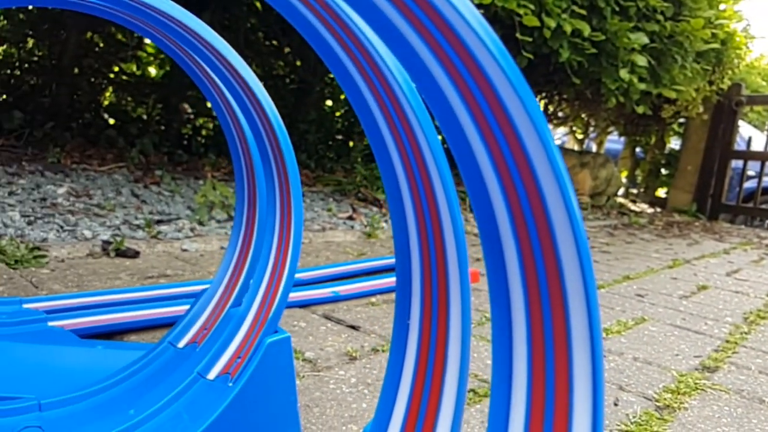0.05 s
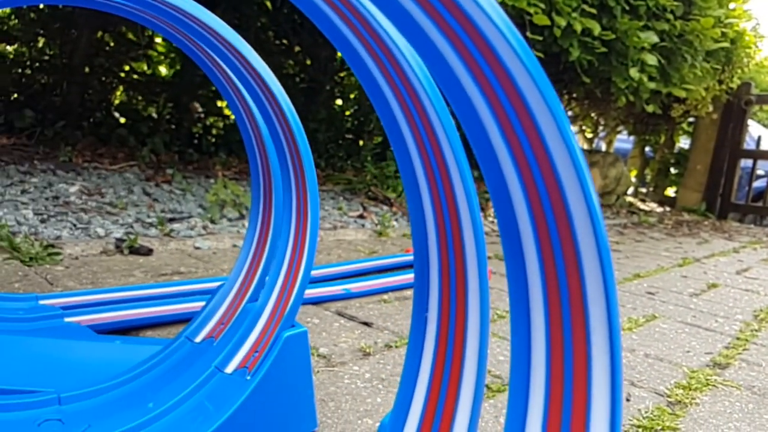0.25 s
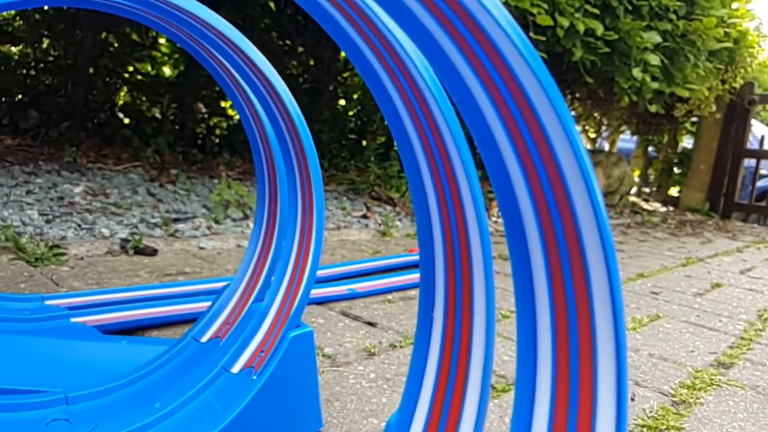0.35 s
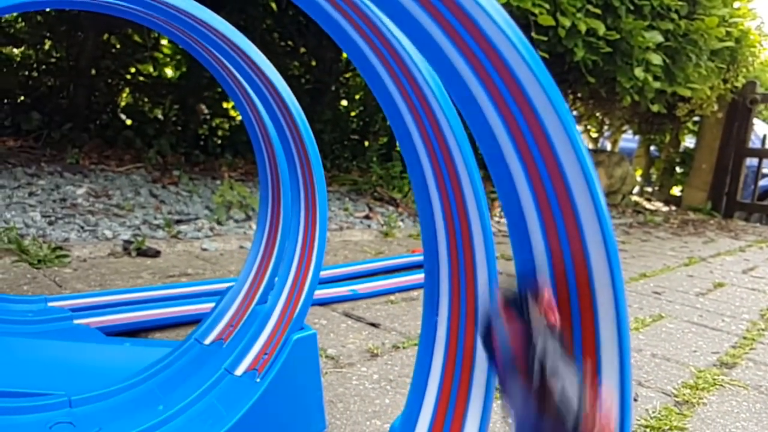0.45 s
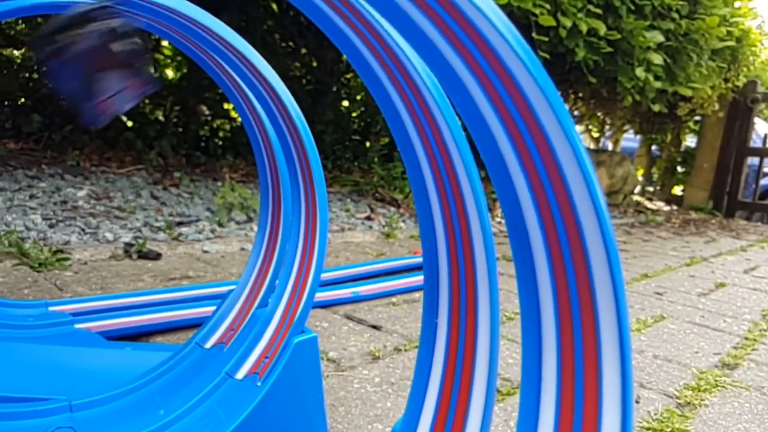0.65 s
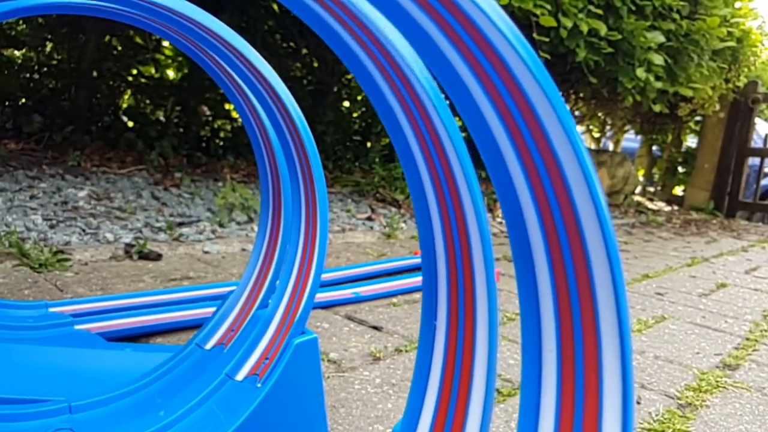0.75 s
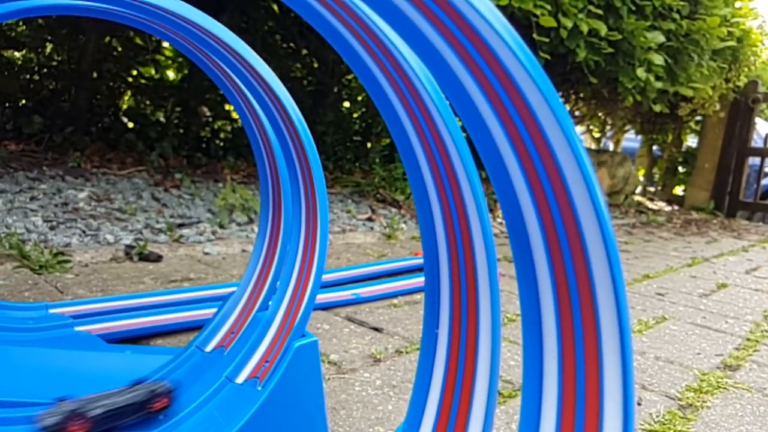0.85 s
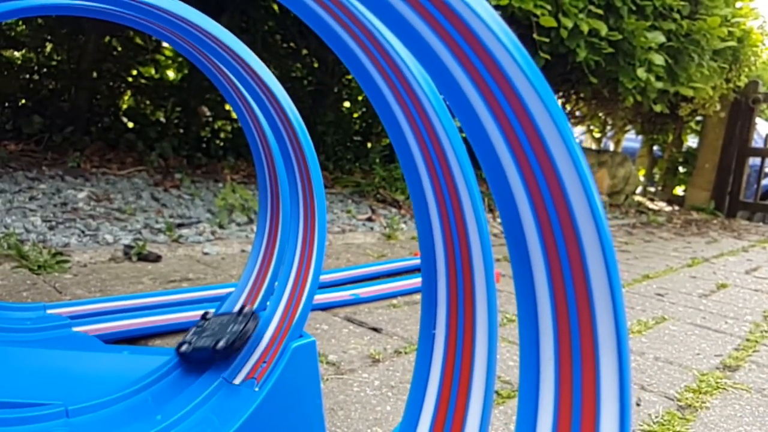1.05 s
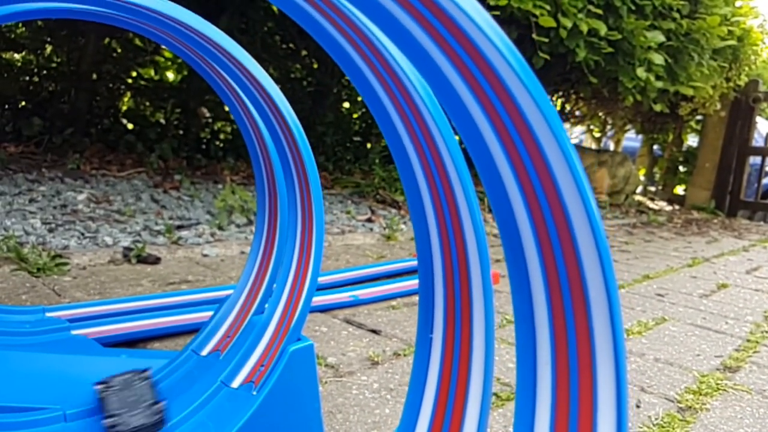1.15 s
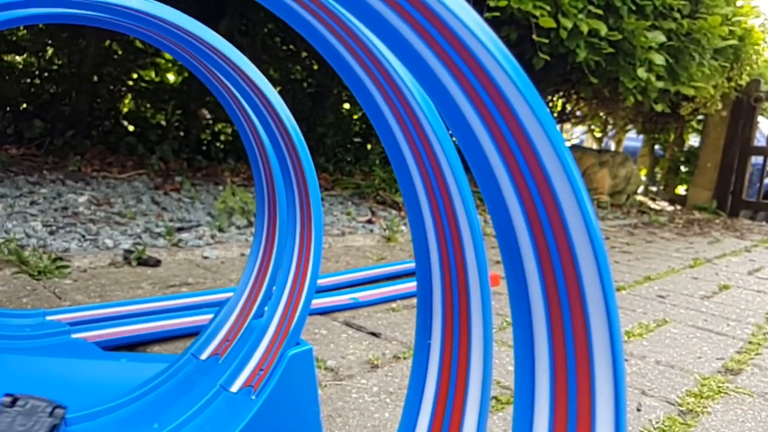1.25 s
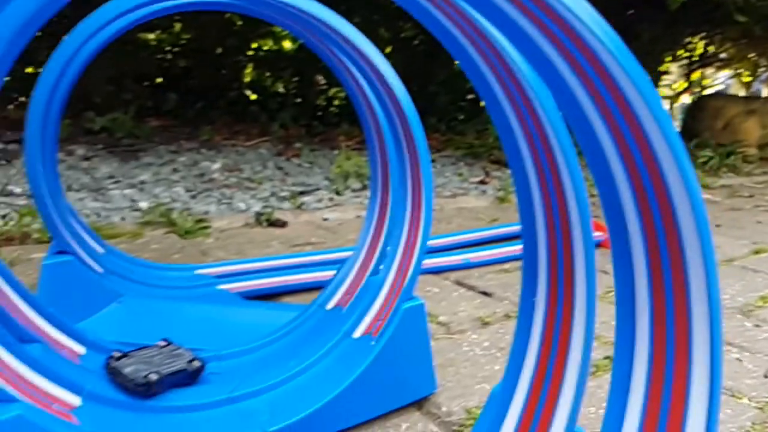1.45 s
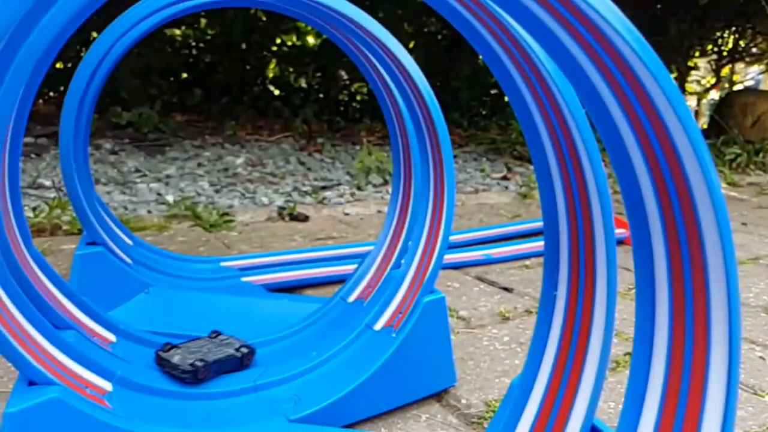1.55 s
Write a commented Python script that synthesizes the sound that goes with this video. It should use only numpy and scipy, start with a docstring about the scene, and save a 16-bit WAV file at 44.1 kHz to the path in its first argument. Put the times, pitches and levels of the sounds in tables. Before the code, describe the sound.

A small metal toy car clatters harshly on hollow plastic track, drops, knocks and rolls away

```python
"""A die-cast toy car rattles round a plastic loop in a garden, drops off, tumbles on the base and rolls out.
Blows and wheel chatter are clicks into decaying modes of the hollow plastic track and the metal car,
with short noise ticks; longer rings of base and axles and a low rumble go with them.
A small bird chirps in gliding, husky tones over far traffic, made of coloured noise."""
import sys
import numpy as np
from scipy import signal
from scipy.fft import rfft, irfft
from scipy.io import wavfile

SR = 44100
rng = np.random.default_rng(int(sys.argv[2]) if len(sys.argv) > 2 else 0)


def ratio(d):
    """dB to gain"""
    e = np.asarray(d, float) / 20
    return 10 ** e


def wav_out(sig):
    """Save sig, one row per channel (or a flat mono array), as 16-bit PCM at SR to the path in sys.argv[1]."""
    wavfile.write(sys.argv[1], SR, np.round(np.clip(np.atleast_2d(sig).T, -1, 1) * 32767).astype(np.int16))


N = 70560
T, F = np.arange(N) / SR, np.fft.rfftfreq(N, 1 / SR)

# Far traffic colour. Each row: frequency in Hz, relative level in dB.
TOWN_COLOUR = [(12, -20), (20, -18.5), (151, -3.5), (351, -18.5), (1350, -12.5), (1600, -35.5),
               (3830, -8.5), (6000, -38.5), (7100, -61.5), (13600, -24.5), (16500, -58)]
# Low rumble. Each row: time in seconds, rms level in dB.
RUMBLE_LEVEL = [(0, -58.5), (.5, -52), (.7, -65), (.9, -54.5), (1.1, -65), (1.6, -63.5)]
# Bird, one list a note. Each row: time in seconds, pitch in Hz, relative level in dB.
BIRD_NOTES = [
    [(.015, 3386, -50), (.035, 4590, -47), (.055, 4600, -50), (.068, 3740, -34.5), (.08, 3460, -55),
     (.09, 3220, -73)],
    [(.02, 3100, -61), (.032, 3334, -57), (.05, 3675, -39), (.06, 3650, -67)],
    [(.068, 2400, -65), (.085, 2920, -46.5), (.1, 2960, -46), (.112, 3180, -70), (.135, 2950, -80)],
    [(.08, 4240, -72), (.092, 4600, -74), (.105, 3760, -65), (.12, 4000, -72)],
    [(.0, 5570, -65), (.02, 6020, -54), (.035, 5700, -69), (.06, 5260, -83)],
]
# Wheels chattering on the track. Each row: time in seconds, relative levels of track ring, car ring and
# tick in dB, middle car ring centre in Hz, left minus right of the whole car in dB.
WHEEL_CHATTER = [(0, -72, -58, -75.5, 3620, 2.5), (.185, -66, -64.5, -78, 2400, 0),
                 (.215, -58, -38.5, -55, 2470, 2.5), (.26, -46, -32.5, -38, 2430, 1),
                 (.3, -48, -29.5, -42.5, 3900, 2.5), (.33, -47, -29, -36.5, 3600, 1.5),
                 (.365, -31.5, -23, -29, 4800, 0.5), (.378, -40, -29, -28.5, 4150, 2.5),
                 (.392, -53, -22.5, -44, 4540, 2.5), (.42, -57, -29.5, -28.5, 4170, -1),
                 (.445, -23.5, -17.5, -31, 3330, 4.5), (.463, -31.5, -38, -41, 3040, -3),
                 (.5, -31.5, -22.5, -39, 3200, -1.5), (.535, -24.5, -24, -30.5, 3300, 1.5),
                 (.556, -47, -35, -47, 3060, -1), (.595, -32, -36, -43, 4400, 1),
                 (.63, -63, -76, -60, 3760, 5), (.7, -69, -49.5, -56, 4030, 4.5),
                 (.785, -80, -76, -62, 3730, -2.5), (.8, -40, -57, -54, 3480, 0),
                 (.85, -32.5, -40, -54, 2630, 1.5), (.9, -28, -36.5, -47, 2700, 1),
                 (.95, -43.5, -35.5, -47, 2490, 2.5), (.985, -41.5, -51.5, -66, 2450, 2.5),
                 (1.02, -50.5, -47.5, -58, 2580, 1.5), (1.065, -83, -72, -70, 2540, 2.5),
                 (1.12, -50, -54.5, -58, 4000, 2.5), (1.165, -72, -63, -63.5, 2500, 0.5),
                 (1.18, -40, -38, -39, 2520, 0.5), (1.25, -40, -39, -52, 3340, 2.5),
                 (1.3, -35.5, -41.5, -52, 2530, 2), (1.35, -39, -42, -61, 2720, 2),
                 (1.4, -47, -59, -60, 2500, 0.5), (1.45, -40, -47.5, -71, 2550, 1),
                 (1.495, -50, -56.5, -73, 2540, -0.5), (1.53, -41.5, -50.5, -63.5, 2500, 0.5),
                 (1.6, -57, -60, -72, 2500, -2)]
# Blows of car on track. Each row: start in seconds, relative levels of track ring, car ring and tick
# in dB, car ring centre in Hz, track ring centre in Hz.
CAR_BLOWS = [(0.143, -48.5, -47, -55.5, 2560, 950), (0.197, -52, -40.5, -54, 2200, 902),
             (0.206, -54, -36, -68, 2250, 490), (0.215, -39.5, -49, -36.5, 2650, 740),
             (0.247, -26, -19.5, -39, 2050, 956), (0.279, -48, -24.5, -30.5, 2720, 1010),
             (0.308, -38.5, -24.5, -27, 4900, 746), (0.333, -53, -15, -24, 3800, 826),
             (0.335, -29.5, -13, -39, 3820, 880), (0.342, -28, -13.5, -52, 2530, 1430),
             (0.364, -28, -17.5, -26, 5450, 836), (0.387, -43, -20, -23, 3500, 869),
             (0.397, -49, -13.5, -27, 4440, 856), (0.412, -47, -12.5, -24, 4670, 534),
             (0.419, -50, -18, -41, 3730, 953), (0.434, -12.5, -12, -26, 4400, 697),
             (0.466, -20, -34, -24, 2100, 690), (0.476, -19.5, -13, -13, 3600, 540),
             (0.481, -21, -10.5, -33, 3580, 510), (0.489, -28, -16, -28, 3250, 727),
             (0.503, -23, -16.5, -22.5, 3300, 514), (0.523, -34, -25, -18, 3600, 740),
             (0.527, -16, -31, -23, 4070, 780), (0.537, -24, -38, -19.5, 3480, 640),
             (0.562, -18, -34, -38, 2450, 770), (0.576, -33, -23, -24, 4800, 900),
             (0.587, -30, -19, -23.5, 4640, 706), (0.791, -9, -15, -21, 3270, 682),
             (0.816, -18.5, -17, -18, 2630, 760), (0.828, -29.5, -14.5, -20, 2850, 856),
             (0.845, -27.5, -22, -27, 2560, 1250), (0.853, -18.5, -21.5, -31, 2570, 484),
             (0.874, -13.5, -13.5, -20, 2600, 850), (0.887, -5.5, -13.5, -21, 2180, 695),
             (0.904, -34, -32, -55, 2660, 680), (0.922, -11.5, -20, -33, 2980, 754),
             (0.932, -10.5, -19.5, -24.5, 1970, 763), (0.952, -16, -27.5, -51, 2140, 776),
             (0.996, -35, -57, -69, 2450, 740), (1.009, -40, -38, -38.5, 2480, 719),
             (1.091, -35, -56, -36.5, 2500, 684), (1.134, -17.5, -35, -37.5, 4060, 745),
             (1.171, -12.5, -21.5, -30, 2420, 716), (1.182, -20, -23.5, -51, 2220, 770),
             (1.193, -15.5, -22, -34, 4230, 794), (1.223, -21.5, -26, -40, 2560, 684),
             (1.234, -20, -27.5, -33.5, 4000, 666), (1.275, -20, -25.5, -38.5, 2600, 740),
             (1.312, -25, -34, -42, 2340, 735), (1.367, -21, -31, -42.5, 2450, 686),
             (1.389, -34, -40, -42.5, 2480, 764), (1.411, -40, -53, -48, 2480, 711),
             (1.433, -42, -42.5, -49.5, 2480, 700), (1.459, -32.5, -39.5, -56, 2490, 746),
             (1.51, -30.5, -46.5, -69, 2500, 710), (1.529, -34.5, -42, -54.5, 2550, 690)]
# Hollow plastic track. Each row: mode in Hz, relative level in dB, undamped t60 in seconds.
TRACK_MODES = [(240.6, -20, 0.1), (428, -16, 0.12), (531, -6.5, 0.06), (645, -8, 0.032), (740, -6, 0.064),
               (835, -3, 0.029), (973, -2, 0.021), (1230, 7, 0.032), (1425, 3.5, 0.041), (1680, 5.5, 0.043)]
# Metal car body and axles. Each row: mode in Hz, relative level in dB, undamped t60 in seconds.
CAR_MODES = [(1900, 2.5, 0.017), (2184, -1, 0.021), (2450, -0.5, 0.025), (2650, -0.5, 0.024),
             (2872, -6, 0.034), (3200, -5, 0.023), (3509, 0.5, 0.027), (3730, -6.5, 0.046),
             (4103, -2.5, 0.03), (4400, 1.5, 0.013), (4800, -5.5, 0.017), (5000, -12, 0.031),
             (6150, 1, 0.017), (6610, -6, .03)]
# Contact tick colour. Each row: frequency in Hz, relative level in dB.
TICK_COLOUR = [(880, -71), (1500, 2), (2070, -8.5), (2480, 0.5), (4340, 0.5), (5360, -0.5), (6760, -1),
               (14100, -7), (16000, -17), (16500, -66)]
# Hollow base (lowest) and loose axles. Each row: mode in Hz, relative level in dB, undamped t60 in seconds.
AXLE_MODES = [(743.6, -1, 0.11), (2480, -1.5, 0.086), (3730, -5.5, 0.093), (4227, -4.5, 0.085),
              (6500, -13, .05)]
# Drive of those rings. Each row: time in seconds, relative level in dB.
AXLE_LEVEL = [(0, -110), (.195, -100), (.22, -64), (.4, -65.5), (.58, -67), (.64, -97), (.7, -85),
              (.785, -87), (.85, -50), (.98, -79), (1.015, -67.5), (1.07, -85.5), (1.16, -82), (1.19, -58),
              (1.3, -59.5), (1.4, -70), (1.5, -84), (1.53, -77), (1.6, -85)]
# Unlike share at the two ports. Each row: frequency in Hz, gain in dB.
UNLIKE_SHARE = [(100, -13), (700, -17.5), (1500, -2.5), (3000, -1.5), (8000, -1.5), (16000, -10)]
# Port colour. Each row: frequency in Hz, left minus right in dB.
PORT_COLOUR = [(60, -1), (110, 3), (200, 1), (380, 0.5), (700, 2), (1290, 1.5), (2380, -6), (4400, -5.5),
               (8120, 1.5), (15000, 11)]
# Port timing. Each row: frequency in Hz, lag of the right port in seconds.
PORT_LAG = [(300, 0.00029), (800, .00015), (1500, 0.00012), (3000, 0.000096), (7000, 0.00026),
            (16000, 0.000252)]

TOWN_RMS_DB, RUMBLE_TOP_HZ, HUSK_HZ = -66, 222, 180
TRACK_GAIN_DB, CAR_GAIN_DB, TICK_GAIN_DB = -7, -8.5, 2
CENTRE_OCT, SCATTER_DB = .28, 3  # width of the favoured mode region, spread of mode strengths
TICK_T60_S, PUSH_SAMPLES = .018, 7
LOWEST_HZ = 216  # small parts radiate little below this
BOUNCE_GAP_S = .001198  # mean
CHATTER_PER_S, CHATTER_SPREAD_DB, CHATTER_TOP_DB = 4500, 2.2, 8
PATCH_S, PATCH_OCT, PATCH_DB = .007, .3, 2  # rolling shifts colour and strength every few ms
ROLLING_HZ = 745  # track ring centre under the wheels
CHATTER_DAMPING, AXLE_DAMPING = .43, .87  # factors on t60; rolling wheels shorten the rings
ECHO_DB, ECHO_T60_S, ECHO_START_S = -20, .2, .006


def along(table, col=1):
    """Table column read over time."""
    return np.interp(T, np.array(table)[:, 0], np.array(table)[:, col])


def over_hz(table):
    """Table read over log frequency."""
    hz, value = np.array(table).T
    return np.interp(np.log(F + 1), np.log(hz + 1), value)


def unit(x):
    """Rms 1."""
    return x / np.sqrt(np.mean(x ** 2))


def traffic():
    """Far traffic: steady coloured noise, partly unlike at the two ports."""
    shared, unlike = rfft(rng.standard_normal((2, N))) * ratio(over_hz(TOWN_COLOUR))
    unlike = unlike * ratio(over_hz(UNLIKE_SHARE))
    return ratio(TOWN_RMS_DB) * unit(irfft([shared + unlike, shared - unlike], N))


def rumble():
    """Low rumble: band-passed noise of varying level, mostly alike at the two ports."""
    band = signal.butter(2, [40, RUMBLE_TOP_HZ], "band", fs=SR)
    shared, unlike = signal.lfilter(*band, rng.standard_normal((2, N)))
    return ratio(along(RUMBLE_LEVEL)) * unit(shared + 0.25 * unlike * np.array([[1], [-1]]))


def bird():
    """Gliding sine notes made husky by slow noise in their amplitude."""
    out = np.zeros(N)
    for note in BIRD_NOTES:
        husk = signal.lfilter(*signal.butter(2, HUSK_HZ, fs=SR), rng.standard_normal(N))
        on = (T >= note[0][0]) & (T <= note[-1][0])
        tone = np.sin(2 * np.pi * np.cumsum(along(note)) / SR)
        out += on * ratio(along(note, 2)) * (.9 + 0.63 * unit(husk)) * tone
    return out


def ring(at, gains, modes, damping):
    """Clicks at samples `at` ring each mode, a decaying sine, with its own gain."""
    out = np.zeros(N)
    for (hz, db, t60_s), gain in zip(modes, gains.T):
        t60_s = max(t60_s * damping, .004)
        pole = np.exp(2j * np.pi * hz / SR - np.log(1000) / (t60_s * SR))
        out += ratio(db) * signal.lfilter([1], [1, -pole], np.bincount(at, gain, N)[:N]).imag
    return out


def mode_gains(modes, centre_hz, floor):
    """Fresh random mode strengths for each contact, favouring modes near its centre."""
    octaves = np.log2(np.array(modes)[:, 0] / centre_hz[:, None])
    near = np.exp(-.5 * (octaves / CENTRE_OCT) ** 2) + floor
    scatter = ratio(SCATTER_DB * rng.standard_normal(near.shape))
    gains = near * scatter * rng.choice([-1, 1], near.shape)
    return gains / np.sqrt(np.mean(gains ** 2, axis=1, keepdims=True))


def contact_tick(at, tick_db):
    """Coloured noise, dying away after each contact."""
    fade = np.exp(-np.log(1000) / (TICK_T60_S * SR))
    env = signal.lfilter([1], [1, -fade], np.bincount(at, ratio(tick_db + TICK_GAIN_DB), N)[:N])
    return irfft(rfft(env * rng.standard_normal(N)) * ratio(over_hz(TICK_COLOUR)), N)


def contact(sec, track_db, car_db, tick_db, car_hz, track_hz, damping=1.):
    """Each contact rings track and car and gives a short tick."""
    at = np.clip((sec * SR).astype(int), 0, N - 1)
    track_gains = ratio(track_db + TRACK_GAIN_DB)[:, None] * mode_gains(TRACK_MODES, track_hz, .1)
    track = ring(at, track_gains, TRACK_MODES, damping)
    push = np.hanning(PUSH_SAMPLES)  # softens the push on the track
    track = np.convolve(track, push / push.sum())[:N]
    car_gains = ratio(car_db + CAR_GAIN_DB)[:, None] * mode_gains(CAR_MODES, car_hz, .22)
    car = ring(at, car_gains, CAR_MODES, damping)
    high_pass = signal.butter(3, LOWEST_HZ, "high", fs=SR, output="sos")
    return signal.sosfilt(high_pass, track + car + contact_tick(at, tick_db))


def wheel_clicks():
    """Random wheel contacts: sample, size in dB and colour shift in octaves, in short patches."""
    at = np.flatnonzero(rng.random(N) < CHATTER_PER_S / SR)
    patch = rng.standard_normal((N, 2))[(at / (PATCH_S * SR)).astype(int)]
    size_db = CHATTER_SPREAD_DB * rng.exponential(size=len(at)) + PATCH_DB * patch[:, 0]
    return at, np.minimum(size_db, CHATTER_TOP_DB), PATCH_OCT * patch[:, 1]


def wheel_chatter(at, size_db, shift_oct):
    """Dense wheel clicks ring track and car, damped by the rolling."""
    track_db = along(WHEEL_CHATTER, 1)[at] + size_db - 8
    car_db = along(WHEEL_CHATTER, 2)[at] + size_db - 9.5
    tick_db = along(WHEEL_CHATTER, 3)[at] + size_db - 20.5
    car_hz = along(WHEEL_CHATTER, 4)[at] * 2 ** shift_oct
    track_hz = np.full(len(at), ROLLING_HZ)
    return contact(at / SR, track_db, car_db, tick_db, car_hz, track_hz, CHATTER_DAMPING)


def blow_bounces():
    """Each blow lands as three quick bounces; returns the columns for contact()."""
    count = len(CAR_BLOWS)
    sec, track_db, car_db, tick_db, car_hz, track_hz = np.repeat(np.array(CAR_BLOWS), 3, axis=0).T
    gaps_s = BOUNCE_GAP_S * rng.uniform(.5, 1.5, (count, 3)) * [0, 1, 1]
    sec = sec + np.cumsum(gaps_s, axis=1).ravel()
    track_db = track_db + np.tile([-1, -8, -11], count)
    weaker_db = np.tile([-5, -2, -8], count)
    return sec, track_db, car_db + weaker_db, tick_db + weaker_db, car_hz, track_hz


def base_and_axles(at, size_db):
    """Wheel clicks drive longer, narrower rings of hollow base and loose axles."""
    level = ratio(along(AXLE_LEVEL)[at] + size_db)[:, None]
    gains = level * rng.standard_normal((len(at), len(AXLE_MODES)))
    return ring(at, gains, AXLE_MODES, AXLE_DAMPING)


def car_on_track():
    """Two versions with the same contacts but fresh mode strengths and tick noise."""
    bounces = blow_bounces()
    at, size_db, shift_oct = wheel_clicks()
    return [base_and_axles(at, size_db) + contact(*bounces) + wheel_chatter(at, size_db, shift_oct)
            for _ in range(2)]


def garden_echo(x):
    """Short garden echo: decaying noise of unit energy, separate at each port."""
    t = T[:SR // 2]
    tail = rng.standard_normal((2, SR // 2)) * ratio(-60 * t / ECHO_T60_S) * (t > ECHO_START_S)
    tail = tail / np.sqrt((tail ** 2).sum(axis=1, keepdims=True))
    return ratio(ECHO_DB) * signal.fftconvolve(x[None], tail, axes=1)[:, :N]


def scene():
    """Car at a pair of ports, a short garden echo, rumble, bird and traffic."""
    mid, side = car_on_track()
    side = irfft(rfft(side) * ratio(over_hz(UNLIKE_SHARE)), N)
    pan = ratio(np.outer([.5, -.5], along(WHEEL_CHATTER, 5)))
    car = pan * np.array([mid + side, mid - side])
    echo = garden_echo(mid + 5.8 * bird())  # the bird drives the echo harder than the car does
    return rumble() + car + bird() + echo + traffic()


def low_pass(x):
    """Removes everything above the highest recorded frequency."""
    return signal.sosfilt(signal.butter(12, 16990, fs=SR, output="sos"), x)


def record(dry):
    """The two ports differ in colour and arrival time; the loudest peaks are rounded."""
    half = ratio(over_hz(PORT_COLOUR) / 2) * np.exp(1j * np.pi * F * over_hz(PORT_LAG))
    ports = irfft(rfft(dry) * [half, 1 / half], N)
    return low_pass(np.tanh(ports))


dry = scene()
out = record(dry)
wav_out(out)
```